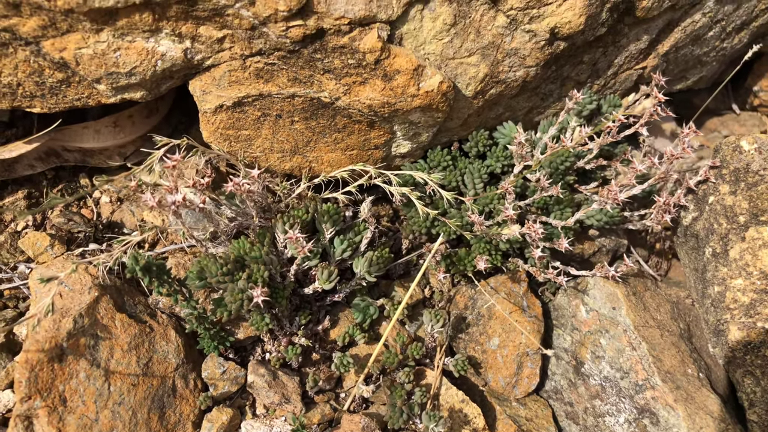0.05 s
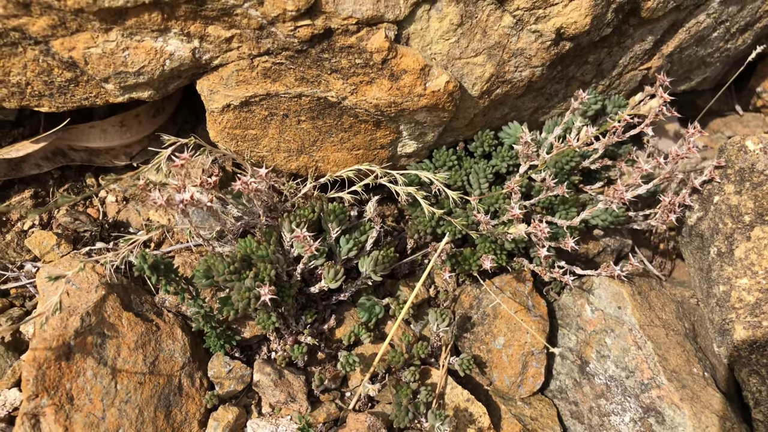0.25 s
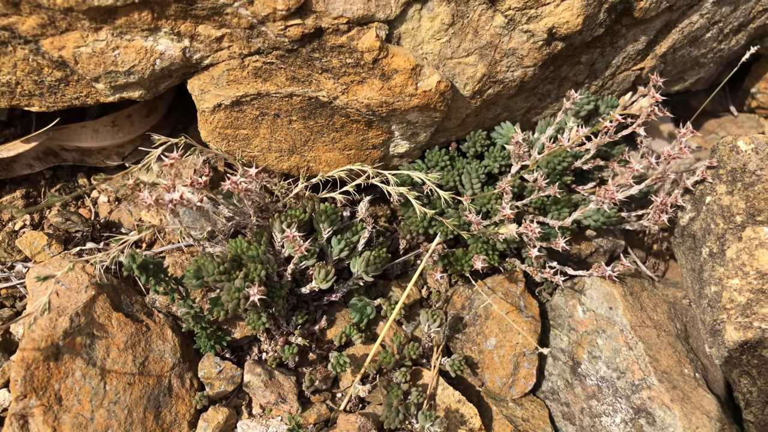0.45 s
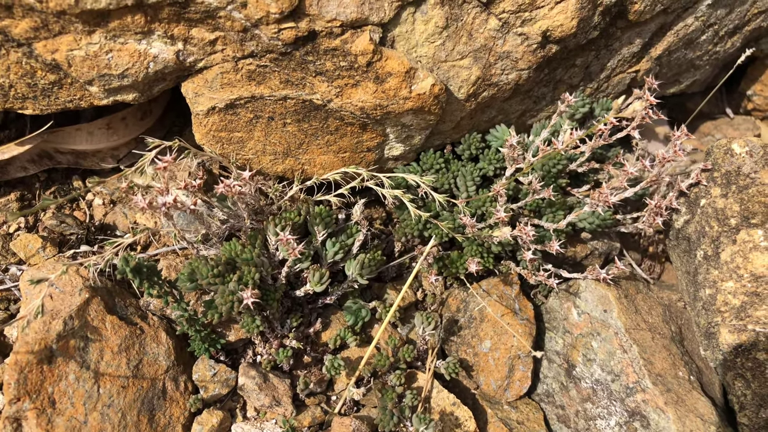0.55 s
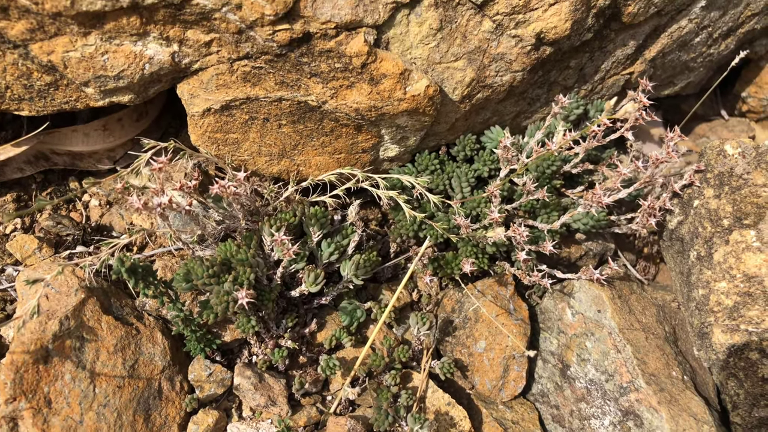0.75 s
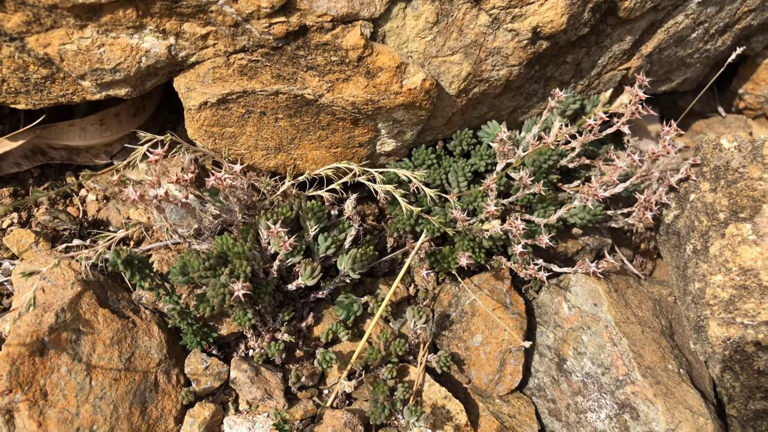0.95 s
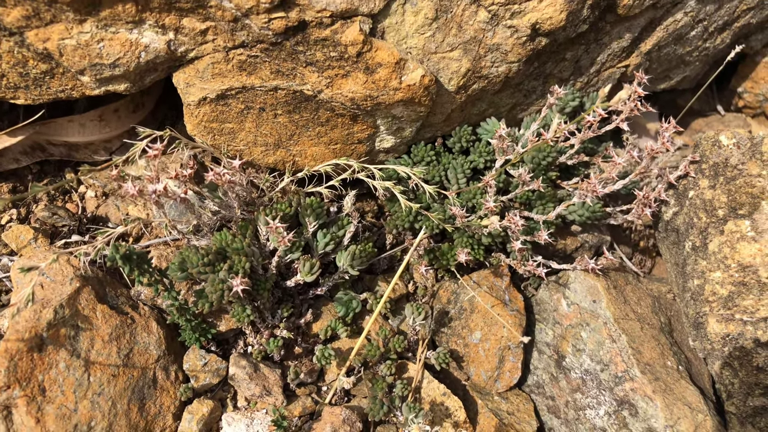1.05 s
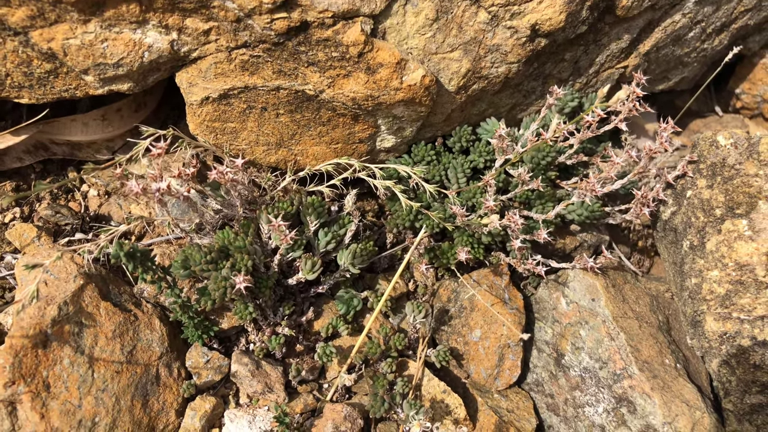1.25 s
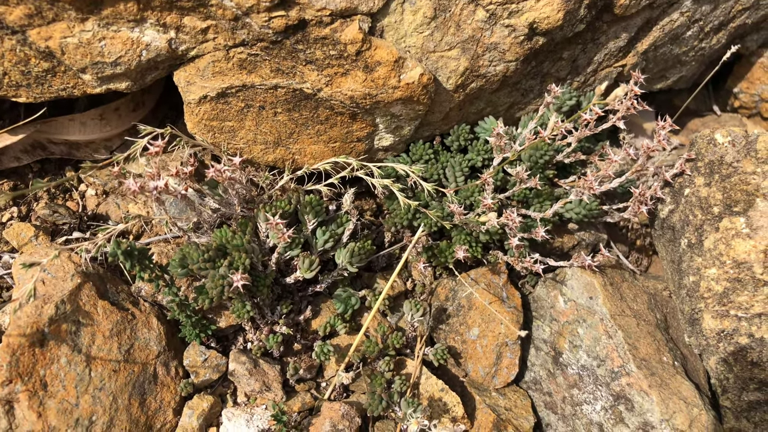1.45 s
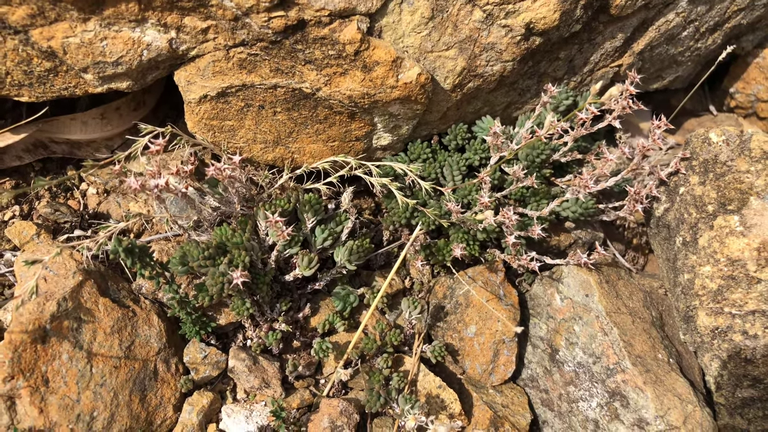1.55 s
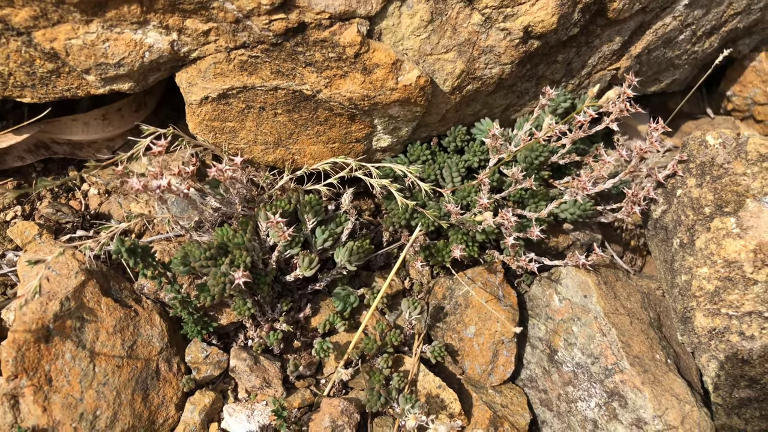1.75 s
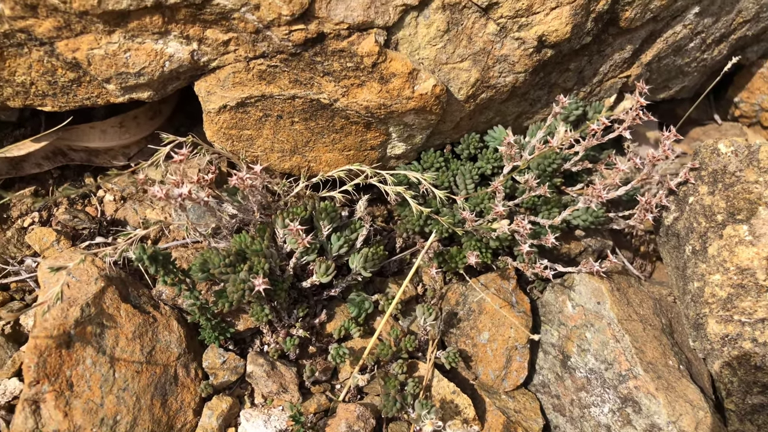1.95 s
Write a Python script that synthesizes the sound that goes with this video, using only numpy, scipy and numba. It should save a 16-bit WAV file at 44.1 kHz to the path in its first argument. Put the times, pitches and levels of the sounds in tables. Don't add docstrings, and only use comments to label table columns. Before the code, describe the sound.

A near grasshopper's fast, scratchy chirring runs throughout on open stony ground, with thin far insect hiss and a weak low traffic rumble beneath; a faint dry stem tick at the very end, phone microphone, mono.

```python
import sys
import numpy as np
from scipy import signal
from scipy.fft import rfft, irfft
from scipy.io import wavfile
from scipy.ndimage import uniform_filter1d
from numba import njit

SR = 44100
rng = np.random.default_rng(int(sys.argv[2]) if len(sys.argv) > 2 else 0)


def dump_mix(stems):
    frames = np.atleast_2d(stems).T
    limited = np.clip(frames, -1, 1)
    pcm = np.round(limited * 32767).astype(np.int16)
    wavfile.write(sys.argv[1], SR, pcm)


def voltage_ratio(level):
    return 10 ** (np.asarray(level, float) / 20)


N = 88200

# (share of the stroke [0-1], pressure [dB], ringing place on the wing [octaves over 8 kHz])
STROKE = [
    (0., 3, 0.3),
    (.2, -2.5, 0.56),
    (.45, -1.5, 0.),
    (.65, 1.83, 0.087),
    (.82, 2.1, 0.33),
    (1., 1.6, 0.65),
]
# (frequency [Hz], level [dB])
WING = [(2200, -22.5), (3500, -13), (4500, -9.5), (6000, -4.5), (8000, -3.5), (11000, -5.04), (13200, -2.5),
        (16000, 0)]
# (frequency [Hz], width [Hz], level [dB])
STONES = [(5040, 200, 3), (5600, 150, -4), (6070, 200, 4), (6450, 150, -3), (7500, 500, 2.5),
          (8400, 200, -6), (9100, 400, 2.5), (9880, 100, 1.5), (10550, 300, 2.5), (12000, 300, 3),
          (13950, 180, 3.5), (14450, 200, -1.5), (15050, 300, 1.5)]


def level(x, db):
    return x * voltage_ratio(db) / np.sqrt(np.mean(x ** 2))


@njit
def svf(x, hz, width):
    y, b, l = np.empty(len(x)), 0., 0.
    for i in range(len(x)):
        g = np.tan(np.pi * hz[i] / SR)
        k = width[i] / hz[i]
        v = (b + g * (x[i] - l)) / (1 + g * (g + k))
        b = 2 * v - b
        l = l + 2 * g * v
        y[i] = k * v
    return y


def colour(x, points, bumps=(), size=1024):
    f = np.maximum(np.arange(size // 2 + 1) * SR / size, 1)
    point_hz, point_db = np.array(points).T
    db = np.interp(np.log(f), np.log(point_hz), point_db)
    for hz, width, gain in bumps:
        db = db + gain * np.exp(-.5 * ((f - hz) / width) ** 2)
    cepstrum = irfft(np.log(voltage_ratio(db)))
    causal = np.r_[cepstrum[0], 2 * cepstrum[1:size // 2], np.zeros(size // 2)]
    return signal.fftconvolve(x, irfft(np.exp(rfft(causal))))[:N]


def walk(rate):
    hold = int(SR / rate)
    steps = np.repeat(rng.standard_normal(N // hold + 1), hold)
    smooth = uniform_filter1d(uniform_filter1d(steps, hold), hold)[:N]
    return smooth / smooth.std()


def hopper(t):
    t = t + .0019
    share, clicks = leg_strokes(t)
    sound = wing_ring(t, share, clicks)
    bounce = .62
    for ms in [.16, .39, .7]:
        gap = np.zeros(int(ms * SR / 1000))
        sound = signal.lfilter(np.r_[bounce, gap, 1], np.r_[1, gap, bounce], sound)
    return level(colour(sound, WING, STONES), -49.5)


def leg_strokes(t):
    # (stroke end [s], last halt of the leg [s], depth of halts [dB], weak after-jerk [dB])
    strokes = [(-.018, -.03, 8, 0), (.092, .0779, 14, 6), (.1984, .1839, 9, 0), (.3095, .2995, 15, 2),
               (.4195, .4088, 16, 1), (.5269, .5154, 20, 6), (.635, .6256, 18, 0), (.7453, .734, 11, 4),
               (.8548, .8434, 10, 0), (.9643, .9536, 11, 1), (1.0744, 1.0637, 18, 0),
               (1.1861, 1.1718, 9, 0), (1.2985, 1.2866, 18, 7), (1.4184, 1.4127, 16, 0),
               (1.523, 1.5115, 10, 2), (1.6489, 1.6365, 20, 0), (1.7515, 1.7411, 18, 4),
               (1.8695, 1.8557, 15, 0), (1.987, 1.9718, 17, 3), (2.098, 2.085, 11, 0)]
    strengths = [0, 0.15, 0.056, 0.12, .1, 0.11, 0.17, 0.11, .1, .1, 0.068, 0.091, 0.19, .1, 0.14, 0.077,
                 0.031, 0.06, 0.043, .1]
    end, halt, depth, after = np.array(strokes).T
    k = np.clip(np.searchsorted(end, t), 1, len(end) - 1)
    since = t - end[k - 1]
    share = since / (end[k] - end[k - 1])
    place, pressure_db, _ = np.array(STROKE).T
    db = np.array(strengths)[k] + np.interp(share, place, pressure_db)

    jerk_s, halt_s, halt_fade = .0138, .0011, .56
    jerk = (halt[k] - t) / jerk_s
    back = np.maximum(np.round(jerk), 0)
    halt_shape = np.exp(-.5 * ((jerk - back) * jerk_s / halt_s) ** 2)
    db = db - .9 * np.cos(2 * np.pi * jerk)
    db = db - depth[k] * halt_fade ** back * halt_shape

    pause_db = -9 * (1 + .2 * t)
    pause_s = .011 + .0012 * after[k - 1]
    db = db + pause_db * np.exp(-(since / pause_s) ** 2)
    db = db + after[k - 1] * np.exp(-.5 * ((since - .0085) / .0028) ** 2)

    pegs_per_s, edge_s = 1400, .0006
    pressure = uniform_filter1d(voltage_ratio(db), int(edge_s * SR) + 1)
    return share, pressure * (pegs(pegs_per_s) - pegs(pegs_per_s * 1.5))


def pegs(per_s):
    jitter, scatter_db = 0.28, -2
    wait, strength = rng.standard_normal((N // 8, 2)).T
    at = np.cumsum(np.exp(jitter * wait) / per_s) * SR
    heard = at < N
    return np.bincount(at[heard].astype(int), voltage_ratio(scatter_db * strength)[heard], N)


def wing_ring(t, share, clicks):
    place, _, octaves = np.array(STROKE).T
    hz = np.clip(8000 * 2 ** np.interp(share, place, octaves), 3000, 16000)
    ring = svf(clicks, hz, 0.96 * hz)

    vein_at, vein_span = 0.43, 0.12
    vein_touch = np.exp(-.5 * ((share - vein_at) / vein_span) ** 2) * voltage_ratio(3 * walk(59.9))
    vein_hz = 8720 * (1 + .02 * walk(30) + 0.031 * (share - vein_at))
    vein = svf(clicks * vein_touch, vein_hz, 550 + 0 * t)

    late = share - 0.74
    cell_touch = np.exp(-.5 * (late / .13) ** 2)
    cell_hz = 10870 * 2 ** (1.0 * late)
    cell = svf(clicks * cell_touch, cell_hz, 700 + 0 * t)

    bare_clicks = voltage_ratio(-7.5) * clicks
    return ring + bare_clicks + (level(vein, -10) + level(cell, -12)) * ring.std()


def stem(t):
    # (frequency [Hz], width [Hz], level [dB])
    stem_modes = [
        (2440, 500, -2),
        (3490, 380, 0),
        (4474, 320, 6.5),
    ]
    tick_s, t60_s = 1.983, 0.12
    decay = voltage_ratio(-60 * np.maximum(t - tick_s, 0) / t60_s)
    burst = rng.standard_normal(N) * (t > tick_s) * decay
    tick = sum(voltage_ratio(db) * svf(burst, hz + 0 * t, width + 0 * t) for hz, width, db in stem_modes)
    return voltage_ratio(-63.5) * 5 * tick


def chorus(t):
    hiss = rng.standard_normal(N) * voltage_ratio(1.5 * walk(38.27))
    hiss = hiss + voltage_ratio(3) * svf(hiss, 13000 + 0 * t, 6000 + 0 * t)
    return level(colour(hiss, WING, STONES), -64)


def town(t):
    # (frequency [Hz], level [dB per Hz])
    rumble_colour = [(15, -51.5), (25, -24), (70, 0), (119, -3), (157, -4), (211, -9.5), (455, -20),
                     (746, -25.5), (2800, -35), (3640, -38), (6160, -120)]
    # (time [s], frequency [Hz], level [dB])
    drone = [(0.0, 98.9, -53), (0.03, 95.8, -70), (0.1, 76.5, -59.5), (0.21, 79.1, -55), (0.31, 69.6, -57),
             (0.37, 69.2, -68), (0.57, 88.3, -68.5), (0.63, 80.3, -94), (0.71, 78.5, -52),
             (0.82, 77.8, -67), (0.86, 82.46, -64), (1.07, 76.7, -56), (1.3, 80.07, -60.5),
             (1.55, 79.8, -69), (1.63, 89.3, -61.5), (1.71, 81.26, -59), (1.87, 77.2, -53), (2.0, 98, -87)]
    # (time [s], frequency [Hz], level [dB])
    hum = [(0.0, 162.2, -65), (0.02, 162.6, -61.5), (0.18, 163.8, -71.5), (0.26, 158, -47),
           (0.28, 167.7, -66), (0.48, 162.6, -60.5), (0.49, 172, -81), (0.51, 167.3, -78.5),
           (0.76, 166.9, -63), (0.95, 163, -74), (1.0, 162.3, -74), (1.03, 165.1, -65.5),
           (1.46, 165.6, -57), (2.0, 166.2, -58)]
    rumble = colour(rng.standard_normal(N), rumble_colour, size=8192) * voltage_ratio(.5 * walk(2.3))
    return level(rumble, -56) + engine(t, drone) + engine(t, hum)


def engine(t, curve):
    s, hz, db = np.array(curve).T
    db = uniform_filter1d(np.interp(t, s, db), SR // 50) + 0.25 * walk(6.6)
    phase = 2 * np.pi * np.cumsum(np.interp(t, s, hz)) / SR
    return np.sqrt(2) * voltage_ratio(db) * np.sin(phase)


def scene():
    t = np.arange(N) / SR
    return np.tile(hopper(t) + stem(t) + chorus(t) + town(t), (2, 1))


def top_cut(x):
    return signal.sosfilt(signal.butter(12, 16170, fs=SR, output="sos"), x)


def record(dry):
    low_pass = signal.ellip(12, .3, 60, 15500, fs=SR, output="sos")
    mix = signal.sosfilt(low_pass, dry)
    return top_cut(mix)


dry = scene()
out = record(dry)
dump_mix(out)
```